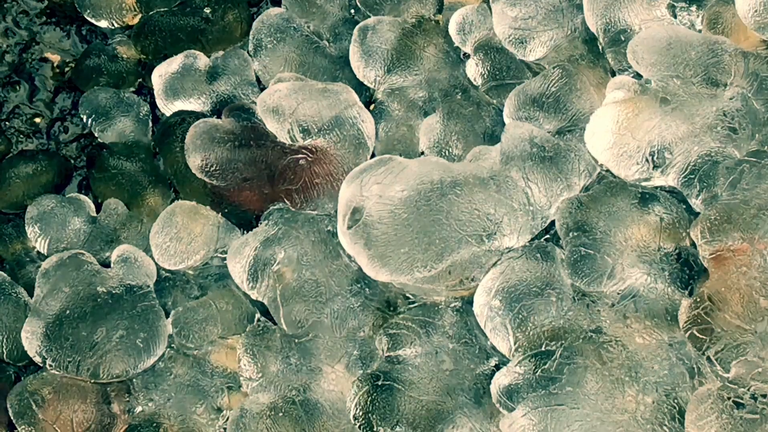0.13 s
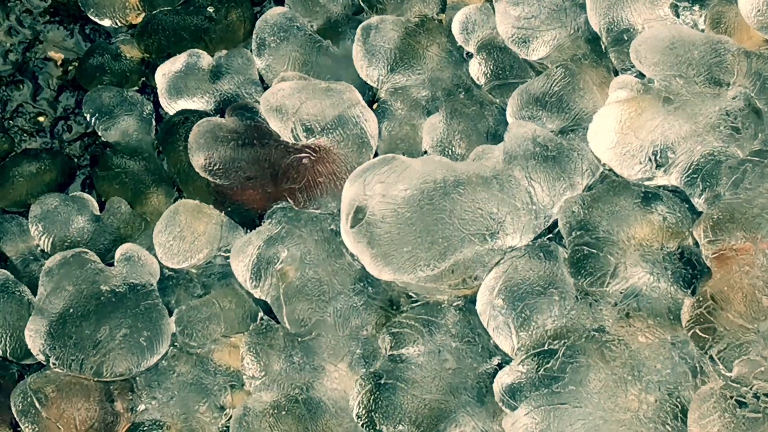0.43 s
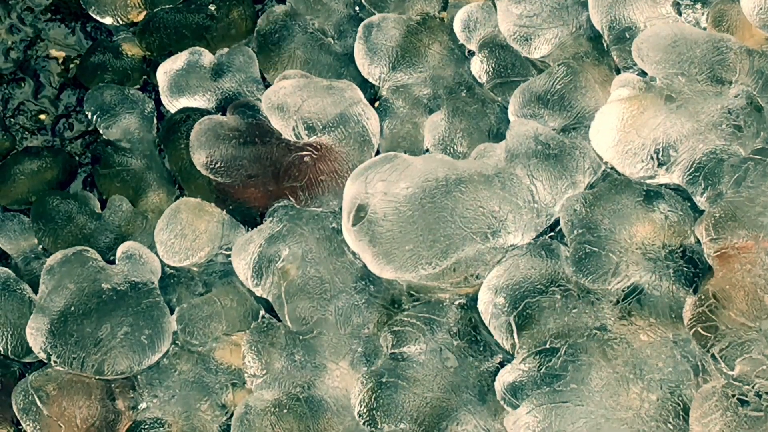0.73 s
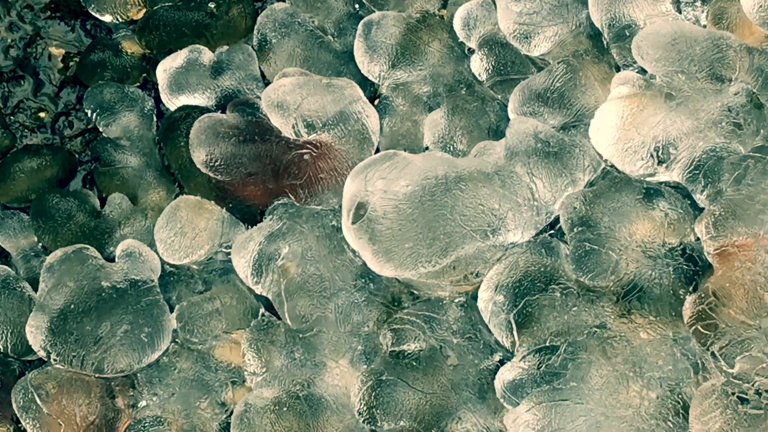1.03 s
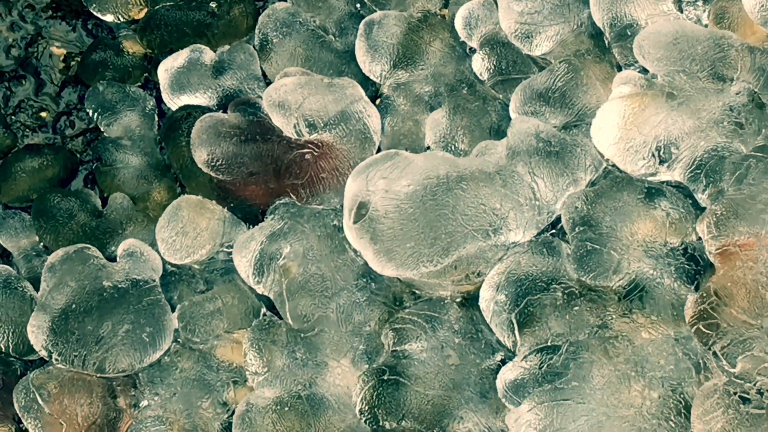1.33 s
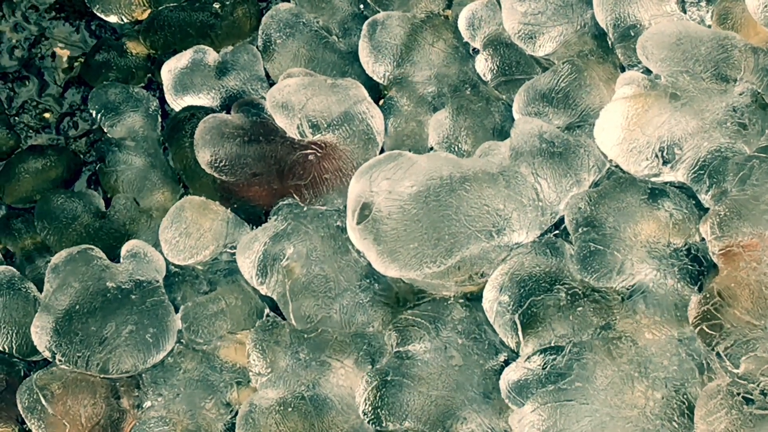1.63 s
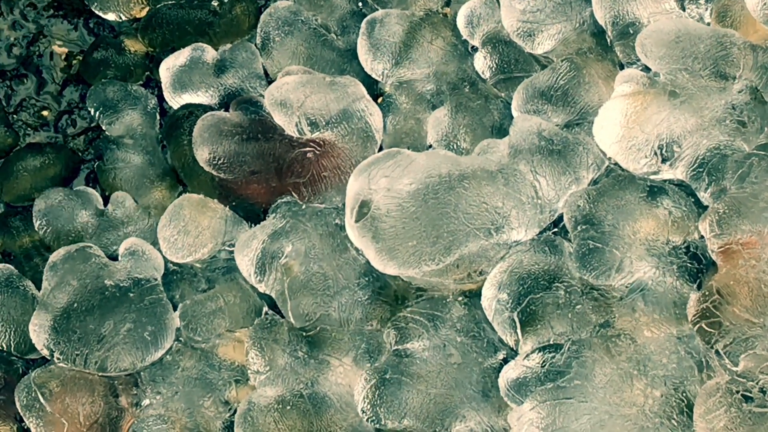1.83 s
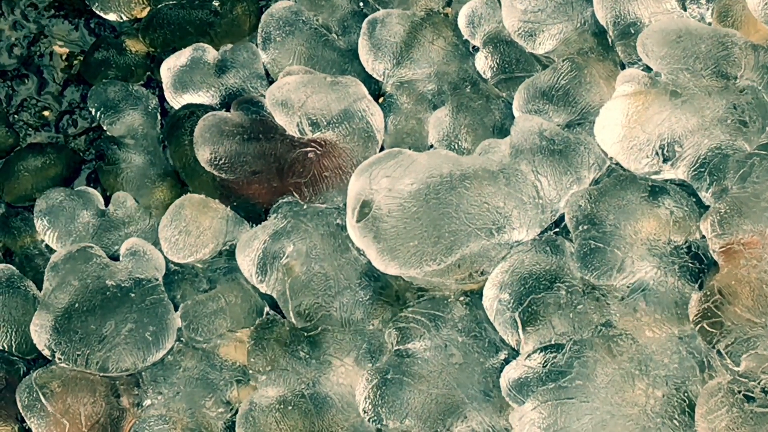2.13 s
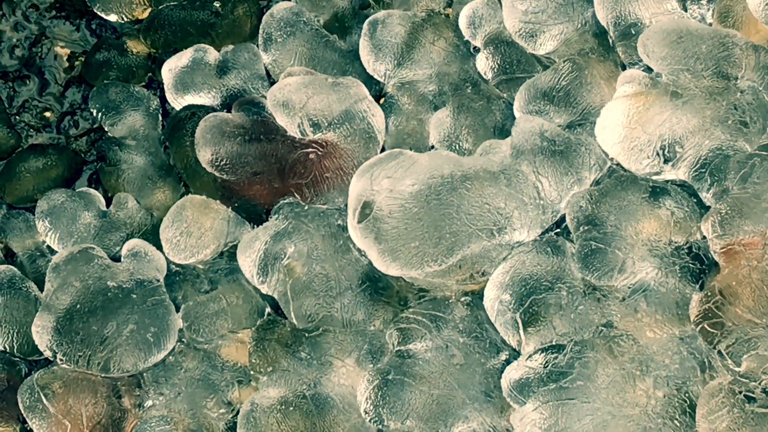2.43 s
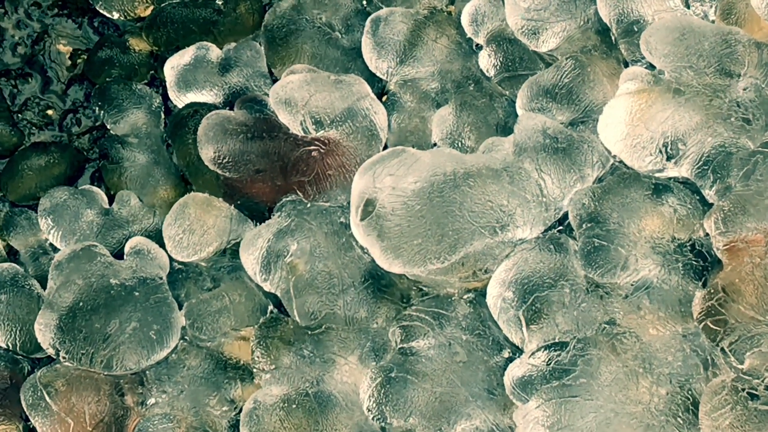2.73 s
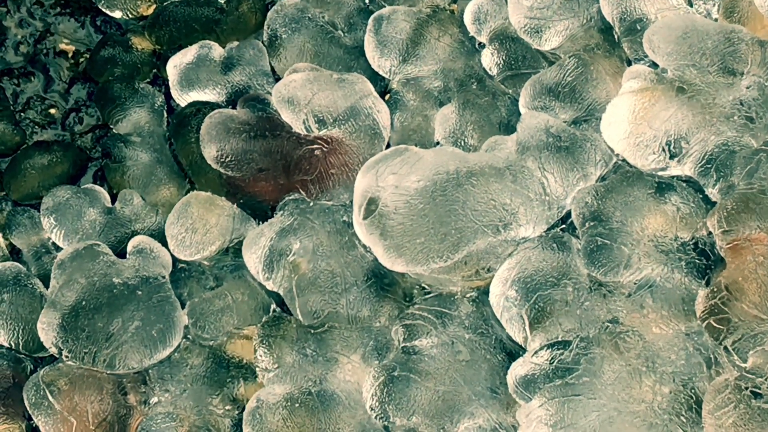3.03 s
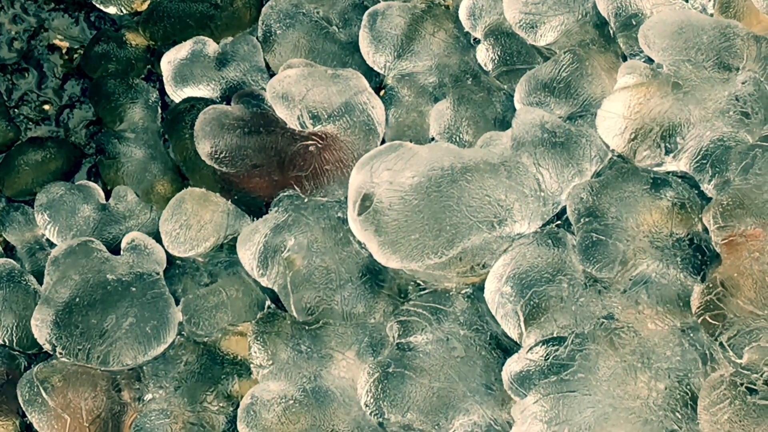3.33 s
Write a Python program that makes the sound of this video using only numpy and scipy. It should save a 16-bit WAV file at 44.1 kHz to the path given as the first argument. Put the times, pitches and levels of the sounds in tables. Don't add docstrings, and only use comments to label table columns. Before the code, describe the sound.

Creek water rushes steadily beside ice, fizzing with tiny bubbles and sharp splashy ticks.

```python
import sys
import numpy as np
from scipy import signal
from scipy.fft import rfft, irfft, next_fast_len
from scipy.io import wavfile
from scipy.ndimage import uniform_filter1d

SR = 44100
rng = np.random.default_rng(int(sys.argv[2]) if len(sys.argv) > 2 else 0)


def wav_out(sig):
    wavfile.write(sys.argv[1], SR, np.round(np.clip(np.atleast_2d(sig).T, -1, 1) * 32767).astype(np.int16))


def to_linear_factor(level_db):
    exponent = np.asarray(level_db, float) / 20
    return 10 ** exponent


N = 154350

# pitch in Hz, level in dB.
FIZZ_COLOUR = [(400, -19), (900, -5), (2000, -8), (3300, -0.5), (6000, 0.5), (10000, -0.5), (16100, -11)]
PING_SAG = 0.061


def evened(x):
    return x / np.sqrt(np.mean(x ** 2) + 1e-20)


def read(points, hz):
    f, value = np.transpose(points)
    return np.interp(np.log(hz + 1), np.log(f + 1), value, left=value[0] - 15)


def curve(rows, col):
    rows = np.array(rows)
    return np.interp(np.arange(N) / SR, rows[:, 0], rows[:, col])


def add(mix, s, sound):
    part = mix[round(s * SR):][:len(sound)]
    part += sound[:len(part)]


def slow(low_hz, top_hz, count=30):
    t = np.arange(0, N + 64, 64) / SR
    waves = [np.sin(2 * np.pi * (f * t + rng.random())) / np.sqrt(f)
             for f in np.geomspace(low_hz, top_hz, count)]
    return np.interp(np.arange(N), t * SR, evened(sum(waves)))


def noise(spectrum, patch_db, size, wide, long):
    frames = 4 * N // size + 5
    hz = np.fft.rfftfreq(size, 1 / SR)
    a, b, patches = rng.standard_normal((frames, len(hz), 3)).T
    patches = uniform_filter1d(patches, max(round(wide), 1), 0)
    patches = evened(uniform_filter1d(patches, max(round(long), 1), 1))
    z = (a + 1j * b) * to_linear_factor(read(spectrum, hz)[:, None] + patch_db * patches)
    return evened(signal.istft(z, nperseg=size, noverlap=size * 3 // 4)[1][:N])


def bubble(hz, cycles, glide, soft=0.074):
    t = np.arange(round(3 * cycles / hz * SR) + 8) / SR
    u = t * hz / cycles
    turns = np.cumsum(np.minimum(hz * (1 + glide * u), .45 * SR)) / SR
    return (1 - np.exp(-u / soft)) * np.exp(-2.3 * u) * np.sin(2 * np.pi * turns)


def sizes(per_s, spread_db, most=4):
    hit = rng.random(N) < per_s / SR
    return hit * to_linear_factor(spread_db * np.minimum(rng.exponential(1, N), most)) * rng.choice([-1, 1], N)


def puff(hz, width, t):
    bins = np.fft.rfftfreq(len(t), 1 / SR)
    band = np.exp(-.5 * (np.log((bins + 1) / hz) / width) ** 2)
    return evened(irfft(rfft(rng.standard_normal(len(t))) * band))


def wash():
    # pitch in Hz, level in dB per Hz.
    wash_colour = [(76, -29), (190, -1), (354, -2.5), (823, -3.5), (1910, 1.5), (6240, 2), (12000, -4.5),
                   (16000, -7)]
    swell_db = 0.44 * slow(2.53, 16)
    return to_linear_factor(-34 + swell_db) * noise(wash_colour, 1.5, size=512, wide=5, long=5)


def fizz(count=40):
    pops = sizes(per_s=4000, spread_db=2.5)
    kind = rng.integers(0, count, N)
    out = np.zeros(N)
    for k, hz in enumerate(np.linspace(20, 123, count) ** 2):
        cycles, glide = 6 * rng.uniform(0.55, 1.0), 0.17 * rng.uniform(-0.69, 2.19)
        grain = bubble(hz, cycles, glide)
        grain = grain / np.linalg.norm(grain)
        out += to_linear_factor(read(FIZZ_COLOUR, hz)) * signal.oaconvolve(pops * (kind == k), grain)[:N]
    return to_linear_factor(-37 + 1.4 * slow(3.5, 40)) * evened(out)


def spray():
    burst = np.exp(-np.arange(600) / SR / 0.0014)
    drops = abs(sizes(per_s=130, spread_db=10, most=1.7))
    gate = signal.oaconvolve(drops, burst)[:N]
    return to_linear_factor(-49.5) * evened(gate * noise(FIZZ_COLOUR, 2.0, size=256, wide=12, long=4))


def rumble():
    # pitch in Hz, level in dB per Hz.
    rumble_colour = [(20, -22), (33, -14), (50, 0.5), (70, -5), (110, -2.5), (150, -9.5), (200, -24.5)]
    return to_linear_factor(-46.5) * noise(rumble_colour, 0.91, size=4096, wide=3, long=4)


def drone():
    # time in seconds, pitch in Hz, level in dB.
    drone_path = [(0.1, 95, -54), (.2, 91.9, -49), (.34, 93.7, -67), (.7, 93.5, -67), (.9, 94.3, -49),
                  (1.1, 103.7, -53), (1.3, 101.1, -44), (1.42, 97.4, -53), (1.56, 99, -47),
                  (1.77, 98, -47.5), (1.85, 95.6, -53)]
    width_hz, steady = 19, 0.44
    t = np.arange(N) / SR
    r = np.exp(-np.pi * width_hz / SR)
    fuzz = rng.standard_normal(N) + 1j * rng.standard_normal(N)
    for _ in range(2):
        fuzz = signal.lfilter([1 - r], [1, -r], fuzz)
    fuzz = evened(fuzz.real) + 1j * evened(fuzz.imag) + steady
    turns = np.cumsum(curve(drone_path, 1)) / SR
    tone = evened((fuzz * np.exp(2j * np.pi * turns)).real)
    fade = np.clip((drone_path[-1][0] - t) / 0.23 + 1, .2, 1)
    return tone * to_linear_factor(curve(drone_path, 2) - 1.0) * fade


def ticks():
    # start in seconds, peak in dB, centre in Hz, length in ms.
    splash_rows = [(.1245, -22, 3500, 4), (.2275, -20, 4000, 4), (.4146, -20, 3300, 4),
                   (.4426, -18, 3000, 8.8), (.566, -23, 3180, 5), (.7255, -21, 2880, 3.5),
                   (.732, -17.5, 2670, 4), (1.0377, -23, 3200, 4), (1.195, -24, 2990, 4),
                   (2.7215, -23, 3200, 2.5), (2.854, -18, 3630, 5), (3.2347, -17, 3330, 4.2),
                   (0.2753, -29, 3140, 4.5), (0.3874, -16.5, 3270, 4.6), (0.6037, -18, 3150, 5.5),
                   (0.62, -15, 3120, 5.3), (1.2287, -19, 3260, 8.3), (1.265, -25, 3330, 4.5),
                   (1.277, -19, 2900, 8), (1.3141, -15.5, 4280, 3.3), (1.6064, -24, 3120, 4.5),
                   (1.6797, -15.5, 3250, 5.1), (1.7695, -30, 3420, 3.6), (1.8149, -17.5, 3235, 4.5),
                   (1.9895, -27, 3260, 4.4), (2.078, -20, 3310, 5), (2.1257, -27, 2680, 4.5),
                   (2.389, -20, 4200, 4.5), (2.5282, -16, 3290, 5.2), (2.714, -17.5, 3170, 5.1),
                   (2.9798, -20, 3130, 4.5), (3.021, -23, 3100, 4.5), (3.1016, -19, 2600, 5.3),
                   (3.115, -22, 3820, 6.6), (3.284, -22.5, 4100, 5.1), (3.3639, -20, 2530, 4.5)]
    # start in seconds, peak in dB, centre in Hz.
    spit_rows = [(0.1507, -23, 14500), (0.2744, -28, 15000), (0.3388, -14, 13000), (0.5503, -17, 11900),
                 (0.7668, -22, 11700), (0.8047, -17, 12600), (0.8237, -11, 13100), (0.9185, -33, 10880),
                 (0.919, -12, 11000), (1.136, -22, 11700), (1.313, -17, 12900), (1.6049, -21, 11300),
                 (1.6797, -20, 14600), (1.7403, -14, 12800), (1.8399, -22, 13100), (1.9047, -19, 13400),
                 (3.1, -29, 13000), (3.1788, -13, 12000), (3.2575, -17, 13300), (3.3509, -17, 13600)]
    rows = list(splash_rows) + [(s, db - 3, hz, 2.7) for s, db, hz in spit_rows]
    out, t = np.zeros(N), np.arange(1200) / SR
    for s, db, hz, ms in rows:
        add(out, s, to_linear_factor(db - 4) * bubble(hz, 4.3, -PING_SAG))
        shape = np.minimum(t / 0.0016, 1) * np.exp(-1000 * t / max(ms, .3))
        shape = shape * np.repeat(rng.exponential(1, len(t) // 20), 20) ** 0.35
        add(out, s, to_linear_factor(db - 10.5) * shape * puff(hz, 0.32, t))
    return out


def snaps():
    # start in seconds, peak in dB, centre in Hz.
    snap_rows = [(0.1262, -21, 5070), (0.1522, -20, 14130), (0.2174, -20, 8560), (0.2307, -21, 4930),
                 (0.2763, -18, 3940), (0.3526, -13.5, 6060), (0.3873, -20, 4760), (0.3955, -21, 6370),
                 (0.416, -24, 4040), (0.4419, -18, 12020), (0.4633, -19, 11400), (0.5524, -17, 13410),
                 (0.5669, -17, 6130), (0.62, -20, 3550), (0.7681, -19, 11890), (0.8086, -16, 5880),
                 (0.8251, -19, 12320), (0.9199, -15, 11270), (0.955, -17, 6460), (1.0388, -24, 5460),
                 (1.1374, -20, 10710), (1.2303, -18, 7840), (1.2334, -23, 3860), (1.2837, -20, 5130),
                 (1.2935, -19, 6340), (1.315, -7, 5810), (1.5844, -21, 7800), (1.6064, -12.5, 8490),
                 (1.6088, -20, 4900), (1.6818, -12, 7430), (1.7409, -13, 10670), (1.7706, -25, 4710),
                 (1.8612, -24, 6260), (1.9911, -25, 4040), (2.0529, -15, 5070), (2.0607, -19, 5000),
                 (2.3892, -21, 5880), (2.4034, -22, 6030), (2.4308, -19, 9250), (2.4794, -17, 10280),
                 (2.499, -14, 7200), (2.5053, -20, 5610), (2.576, -24, 11100), (2.7908, -15, 5840),
                 (2.8265, -18, 5690), (2.8571, -18, 5440), (2.9326, -26, 7580), (3.067, -19, 6530),
                 (3.0793, -21, 6130), (3.1017, -10, 7320), (3.1171, -13, 4040), (3.18, -21, 11810),
                 (3.1959, -17, 5480), (3.236, -24, 3620), (3.2853, -18, 4830), (3.351, -17, 12900)]
    lead_s = 0.00019
    out, t = np.zeros(N), np.arange(1200) / SR
    for s, db, hz in snap_rows:
        add(out, s - lead_s, to_linear_factor(db - 0.5) * bubble(hz, 3, -PING_SAG))
        add(out, s, to_linear_factor(db - 11) * np.exp(-1000 * t / 1.5) * puff(hz, 0.45, t))
    return out


def blobs():
    # start in seconds, peak in dB, pitch in Hz, rise as a share of the pitch.
    blob_rows = [(.654, -27, 1110, .05), (.899, -21, 1580, .05), (0.966, -38, 324, 0.034),
                 (1.112, -26, 1530, .05), (1.494, -33, 519, .03), (2.016, -24, 1500, .05),
                 (2.028, -30, 436, 0.026), (2.381, -31, 476, 0.028), (2.939, -26, 1420, 0.042),
                 (3.01, -32, 365, 0.039), (3.048, -27, 945, 0.036), (3.375, -36, 510, 0.029),
                 (0.225, -25, 1580, 0.078), (0.348, -32, 930, .02), (.486, -19.5, 1630, .08),
                 (0.621, -25, 1670, 0.11), (.738, -29, 850, 0.17), (.861, -24, 1600, .05),
                 (0.94, -21, 1500, 0.045), (1.46, -25, 1030, 0.035), (1.462, -33, 1120, .03),
                 (1.654, -34, 337, .03), (1.845, -27, 624, 0.016), (2.714, -17, 1860, 0.084),
                 (2.748, -21, 845, 0.5), (2.864, -18.5, 1404, 0.22), (3.094, -25, 950, 0.039),
                 (3.242, -27, 990, 0.033)]
    out = np.zeros(N)
    for s, db, hz, rise in blob_rows:
        cycles = 10.4 / (1 + 2 * abs(rise))
        add(out, s, to_linear_factor(db - 2.5) * bubble(hz, cycles, 2 * rise, soft=0.22))
    return out


def engine():
    # time in seconds, firing rate in Hz, level in dB.
    engine_path = [
        (1.84, 77.7, -45),
        (1.95, 80, -54),
        (2.07, 86.3, -48),
        (2.2, 86.8, -54),
        (2.3, 87.6, -45.5),
        (2.55, 91.9, -47.5),
        (2.8, 93, -43.5),
        (3.2, 93.1, -48),
        (3.4, 94.1, -51),
        (3.5, 94, -59),
    ]
    t = np.arange(N) / SR
    turns = np.cumsum(curve(engine_path, 1) + 0.24 * slow(1.33, 4)) / SR
    start = np.clip((t - engine_path[0][0]) / 0.067, 0, 1)
    level_db = curve(engine_path, 2) + 3.5 + 1.3 * slow(4.2, 7.3)
    return start * to_linear_factor(level_db) * np.sin(2 * np.pi * turns)


def bank(x):
    # centre in Hz, width in Hz, change in dB.
    bank_dips = [(240, 9, 2), (300, 15, -2), (1030, 20, 2), (201, 15, -5.5), (840, 77, 2.5), (1100, 31, -1),
                 (3220, 110, 1), (15500, 500, 1), (2000, 216, -2.5), (3840, 206, -2.5), (5070, 300, -2.5),
                 (7500, 290, -3), (10380, 380, -3.5), (13600, 2130, 3.5)]
    delay_s, share, dull_hz = 0.00711, -0.38, 690
    size = next_fast_len(N + 4096)
    hz = np.fft.rfftfreq(size, 1 / SR)
    dips_db = sum(db * np.exp(-.5 * ((hz - f) / w) ** 2) for f, w, db in bank_dips)
    echo = 1 + share * np.exp(-2j * np.pi * hz * delay_s) / (1 + (hz / dull_hz) ** 4)
    return irfft(rfft(x, size) * to_linear_factor(dips_db) * echo, size)[:N]


def scene():
    # time in seconds, level in dB.
    flow_path = [(.1, 0), (.4, 0.4), (.7, 0), (1.0, 0.3), (1.3, -0.06), (1.6, 0.3), (1.9, 0.5), (2.1, 0),
                 (2.3, -0.1), (2.5, 0.5), (2.7, -0.1), (2.9, 0.55), (3.1, 0.3), (3.3, -0.4), (3.5, -0.1)]
    flow = to_linear_factor(curve(flow_path, 1))
    water = flow * (wash() + fizz() + spray()) + ticks() + snaps() + blobs()
    traffic = rumble() + drone() + engine()
    return np.tile(bank(water) + traffic, (2, 1))


def band_limit(x):
    return signal.sosfilt(signal.butter(12, 17090, fs=SR, output="sos"), x)


def record(dry):
    start_s, fade_s = 0.036, 0.063
    fade = np.clip((np.arange(N) / SR - start_s) / fade_s, 0, 1) ** 0.93
    edge = signal.firwin(1023, 15740, window=("kaiser", 9), fs=SR)
    mix = signal.oaconvolve(dry * fade, edge[None], "same")
    return band_limit(mix)


dry = scene()
out = record(dry)
wav_out(out)
```